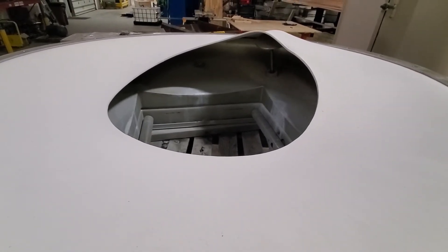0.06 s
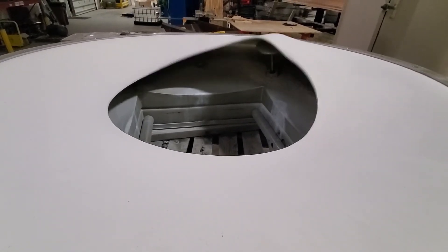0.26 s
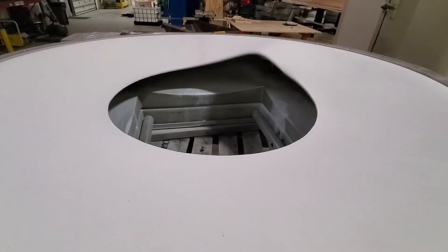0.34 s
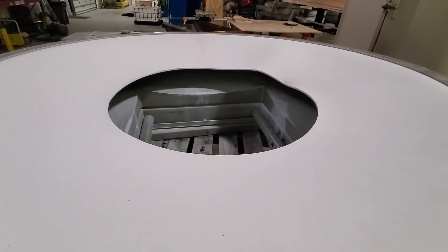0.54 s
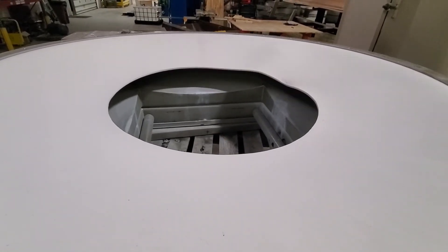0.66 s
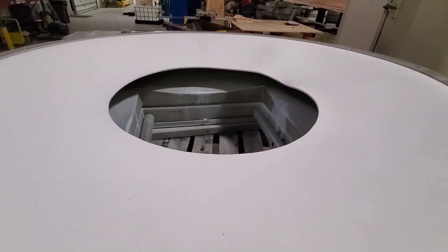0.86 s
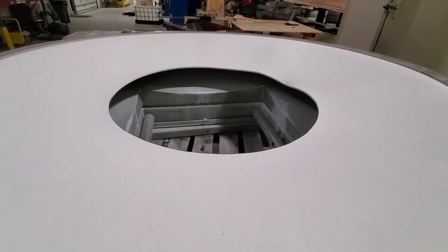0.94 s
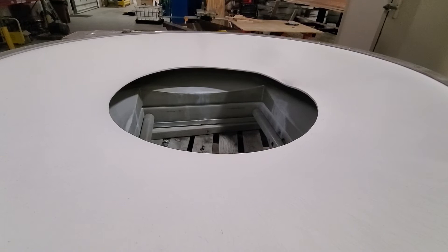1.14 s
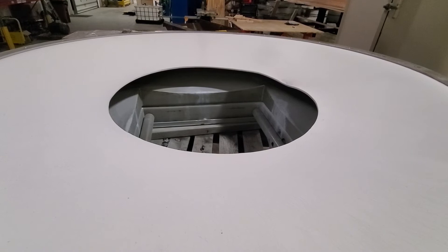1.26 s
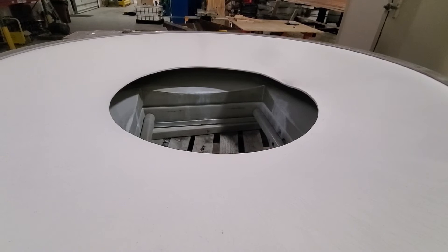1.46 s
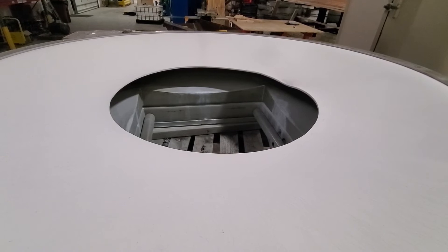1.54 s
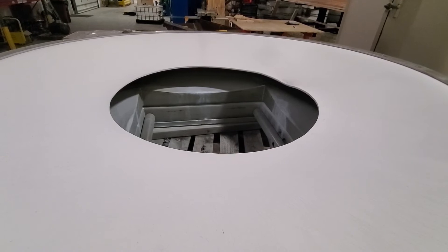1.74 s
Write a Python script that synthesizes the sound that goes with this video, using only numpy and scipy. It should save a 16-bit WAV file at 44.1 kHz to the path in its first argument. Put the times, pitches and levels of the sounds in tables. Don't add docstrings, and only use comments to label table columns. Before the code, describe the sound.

Compressed air bursts through a valve with airy whistles and a small squeak, the piston bangs a steel shell in a quick double blow, then hiss and hall echo die into low hum; close handheld microphone.

```python
import sys
import numpy as np
from scipy import signal
from scipy.fft import rfft, irfft, next_fast_len
from scipy.io import wavfile
from scipy.ndimage import uniform_filter1d

SR = 44100
rng = np.random.default_rng(int(sys.argv[2]) if len(sys.argv) > 2 else 0)


def to_wav(s):
    ch = np.atleast_2d(s).T
    pcm = np.round(np.clip(ch, -1, 1) * 32767)
    wavfile.write(sys.argv[1], SR, pcm.astype(np.int16))


def makeup_ratio(level_db):
    decades = np.asarray(level_db, float) / 20
    return 10 ** decades


N = 79380
T = np.arange(N) / SR
M = next_fast_len(3 * N // 2)
F = np.maximum(np.arange(M // 2 + 1) * SR / M, 1)


def curve(table):
    return np.interp(T, *np.array(table, float).T)


def over_hz(table):
    hz, value = np.array(table, float).T
    return np.interp(np.log(F), np.log(hz), value)


def to_sound(spectrum):
    return irfft(spectrum, M)[..., :N]


def colour(x, gain):
    return to_sound(rfft(x, M) * gain)


def level(x, db):
    return x * makeup_ratio(db) / np.sqrt(np.mean(x ** 2))


def walk(rate_hz):
    hold = int(SR / rate_hz / 2)
    steps = np.repeat(rng.standard_normal(N // hold + 1), hold)
    smooth = uniform_filter1d(uniform_filter1d(steps, hold), hold)
    return level(smooth[:N], 0)


# (frequency [Hz], likeness [0-1])
PORT_LIKENESS = [(100, 0.98), (300, 0.81), (700, 0), (1500, 0.28), (3000, 0.16)]


def wide():
    left_lag_s = 16 / SR
    alike = np.clip(over_hz(PORT_LIKENESS), 0, 1)
    right, other = rfft(rng.standard_normal((2, M)))
    left = alike * right + np.sqrt(1 - alike ** 2) * other
    left = left * np.exp(-2j * np.pi * F * left_lag_s * (F > 900))
    return np.array([left, right])


def bands(db, flicker_db, rate_hz, shape=None):
    spectrum, out = wide() * makeup_ratio(db), 0
    for hz in 35 * 2 ** np.arange(0, 9.1, .5):
        window = np.cos(np.pi * np.clip(np.log2(F / hz), -.5, .5)) ** 2
        band = to_sound(spectrum * window) * makeup_ratio(flicker_db * walk(rate_hz))
        out = out + band * (1 if shape is None else shape(hz))
    return out


def ring(hz, t60_s, swell_s, lag=0.):
    return np.sin(2 * np.pi * hz * T - lag) * makeup_ratio(-60 * T / t60_s) * (1 - np.exp(-T / max(swell_s, 1e-4)))


# (frequency [Hz], level [dB])
HALL_NOISE = [(45, -1), (110, -6), (270, -8), (420, -20), (950, -33.5), (1500, -30), (6000, -38.5),
              (7300, -57.5)]
# (frequency [Hz], level [dB])
HUM_LINES = [(48.4, -52), (199.2, -57), (226.1, -58.5), (689.1, -67.5), (1378, -61.5), (1604, -76.5),
             (1836, -69.5), (2062, -66)]


def workshop():
    lift_db, waver_db = 8, 1.2
    hall = level(bands(over_hz(HALL_NOISE), 0.87, 7.28), -34.5)
    phases = rng.uniform(0, 2 * np.pi, (len(HUM_LINES), 2))
    hum = 0
    for (hz, db), (start, spread) in zip(HUM_LINES, phases):
        port_phase = np.array([[spread * min(hz / 3000, 1)], [0]])
        tone = np.sin(2 * np.pi * hz * T + start + port_phase)
        hum = hum + makeup_ratio(db + lift_db + waver_db * walk(7)) * tone
    rumble_hz, rumble_db, rumble_fade_s = 46, -37, 0.35
    rumble_shape = 1 / (1 + (np.log2(F / rumble_hz) / 0.54) ** 4)
    rumble = level(colour(rng.standard_normal(N), rumble_shape), rumble_db)
    rumble = rumble * np.exp(-(T / rumble_fade_s) ** 2)
    self_noise = level(rng.standard_normal((2, N)), -104)
    return hall + hum + rumble + self_noise


# (time [s], level [dB])
AIR_FLOW = [
    (.152, -72),
    (.172, -34.5),
    (.232, -22.5),
    (.26, -27),
    (.35, -24),
    (.43, -20),
    (.5, -19.5),
    (.745, -22.5),
    (1., -69.5),
]
# (frequency [Hz], level [dB])
HISS = [(300, -4), (1200, -13), (3200, -1), (5600, -0.5), (7000, 0.5), (8400, -11), (11500, -1),
        (15500, -0.5)]


def jet():
    treble_tilt = 1.17
    flow = curve(AIR_FLOW)
    peak = flow.max()

    def swell(hz):
        return makeup_ratio((flow - peak) * (treble_tilt if hz > 8000 else 1) + peak)

    hiss_db = over_hz(HISS)
    hiss = bands(hiss_db, 1.8, 15.77, swell)
    return hiss / np.sqrt(np.mean(makeup_ratio(hiss_db) ** 2))


def ripple():
    depth_db, spacing_hz = 3.0, 70
    bumpy = np.interp(F / spacing_hz, np.arange(1000), rng.standard_normal(size=1000))
    return makeup_ratio(depth_db * bumpy - 1)


# (frequency [Hz], t60 [s])
HALL_DECAY = [(200, 0.58), (1000, 0.87), (3000, 1.245), (6000, 0.5), (8000, 0.6), (12000, 0.1)]


def room(x):
    spectrum, tail = wide(), 0
    table_hz, table_t60 = np.array(HALL_DECAY, float).T
    for hz in 60 * 2 ** np.arange(0, 9.):
        t60_s = np.interp(np.log(hz), np.log(table_hz), table_t60)
        band = to_sound(spectrum * np.cos(np.pi / 2 * np.clip(np.log2(F / hz), -1, 1)) ** 2)
        tail = tail + band * makeup_ratio(-60 * T / t60_s) * (1 - np.exp(-T / .008))
    return colour(x.mean(axis=0), rfft(tail, M) / np.sqrt(SR / 20))


# (start [s], peak [s], end [s], frequency [Hz], level [dB], width [Hz])
EDGE_TONES = [
    (0.209, 0.21, 0.34, 5390, -35, 56.5),
    (0.333, 0.426, 0.65, 3400, -36.5, 85),
    (0.385, 0.47, 0.46, 5640, -29.5, 270),
    (0.552, .65, 1, 3060, -39, 390),
    (.55, .65, 0.845, 5850, -32.5, 500),
    (0.31, .42, 0.39, 13000, -38, 900),
]


def whistles():
    out = 0
    for start, peak, end, hz, db, width_hz in EDGE_TONES:
        tone = level(to_sound(wide() / (1 + ((F - hz) * 2 / width_hz) ** 2)), db)
        out = out + tone * np.interp(T, [start, peak, end], [0, 1, 0])
    return out


# (time [s], frequency [Hz], level [dB], t60 [s])
LINKAGE_BUMPS = [
    (.316, 445, -23.5, 0.16),
    (0.27, 394, -30.5, 0.088),
    (0.29, 490, -37, 0.069),
    (0.21, 84, -24, .11),
    (.514, 226, -13.5, 0.28),
]


def bumps():
    out = np.zeros((2, N))
    for start, hz, db, t60_s in LINKAGE_BUMPS:
        out = out + makeup_ratio(db) * np.interp(T - start, T, ring(hz, t60_s, .003), left=0)
    return out


# (time [s], level [dB])
SEAL_SQUEAK = [
    (.215, -67),
    (.25, -37.5),
    (.295, -29),
    (.33, -39),
    (.36, -43),
    (.395, -35),
    (.44, -39.5),
    (.47, -63),
]


def squeak():
    pitch_hz = 1682 + 4.2 * walk(15)
    phase = 2 * np.pi * np.cumsum(pitch_hz) / SR
    loudness = makeup_ratio(curve(SEAL_SQUEAK) + 1 + 0.92 * walk(36)) * (T < .49)
    return loudness * np.sin(phase + np.array([[1.2], [0]]))


# (time [s], level [dB], contact [ms])
BLOWS = [
    (.5082, -11.5, 0.54),
    (0.5097, -4, 0.36),
    (.5128, -13, 0.2),
    (.5165, -5.5, 0.6),
]
# (frequency [Hz], level [dB], t60 [s], swell [ms])
SHELL_MODES = [(169, -4.5, 0.063, 1.5), (277, -16, 0.45, 6), (301, -18.5, 0.75, 48), (388.7, -13, 0.84, 13),
               (441.8, -2.5, 0.21, 1.3), (599, -11.5, 0.24, 8.2), (655, -13, 0.14, 2.8),
               (739.5, -1, 0.19, 2.1), (741.4, -4.5, 0.14, 14), (859, -20.5, 0.34, 5),
               (937, -13.5, 0.32, 4.9), (1036, -16, 0.37, 4.1), (1189, -12.5, 0.14, 2),
               (1332, -23.5, 0.64, 20)]
# (frequency [Hz], level [dB], t60 [s], left minus right [dB])
ROD_MODES = [(2113, -22, 0.045, 8), (3216, -24.5, 0.18, 6.5), (3217, -8, 0.019, -12),
             (4322, -22, 0.054, -10), (5242, -7, 0.042, -13), (5965, -13.5, 0.048, -6),
             (7040, -28, 0.053, -23)]


def knock():
    shell_struck_s, shell_db, rod_db, rod_rough_db = .5081, 3, 16, 5.5
    rebounds = 0
    for start, db, contact_ms in BLOWS:
        softness = 1 + 1j * F * contact_ms / 1000
        rebounds = rebounds + makeup_ratio(db) * np.exp(-2j * np.pi * F * start) / softness

    body = 0
    shell_lags = rng.standard_normal((len(SHELL_MODES), 2))
    for (hz, db, t60_s, swell_ms), lags in zip(SHELL_MODES, shell_lags):
        body = body - makeup_ratio(db) * np.array([ring(hz, t60_s, swell_ms / 1000, hz / 4000 * lag) for lag in lags])
    shell = colour(body, makeup_ratio(shell_db) * np.exp(-2j * np.pi * F * shell_struck_s))

    rod = 0
    rod_lags = 2 * rng.standard_normal((len(ROD_MODES), 2))
    for (hz, db, t60_s, pan_db), (left_lag, right_lag) in zip(ROD_MODES, rod_lags):
        pair = np.array([ring(hz, t60_s, .0008, left_lag), ring(hz, t60_s, .00059, right_lag)])
        pan = np.array([[pan_db], [-pan_db]]) / 2
        rod = rod + makeup_ratio(db + rod_rough_db * walk(238) + pan) * pair

    crack = level(to_sound(wide() / (1 + (F / 6600) ** 14)), -19) * makeup_ratio(-60 * T / 0.24)
    thud_hz, thud_db, thud_t60_s, thud_width = 661, -18.5, 0.23, 0.86
    thud = level(to_sound(wide() / (1 + (np.log2(F / thud_hz) / 1.12) ** 4)), thud_db)
    thud = thud * makeup_ratio(-60 * T / thud_t60_s)
    thud = thud_width * thud + (1 - thud_width) * thud.mean(axis=0)
    blow = colour(crack + thud, rebounds) * makeup_ratio(rod_db)
    return shell + colour(rod, rebounds) * makeup_ratio(rod_db), blow


def scene():
    jet_wet_db, knock_wet_db, ring_wet_db = -0.5, -9.5, -5.5
    air = jet() + whistles()
    seal = squeak()
    rings, blow = knock()
    wet = room(makeup_ratio(jet_wet_db) * air + makeup_ratio(knock_wet_db) * (blow + makeup_ratio(ring_wet_db) * rings))
    background = workshop()
    direct = colour(air, ripple()) + bumps() + seal + rings + blow
    return background + direct + wet


def top_cut(x):
    return signal.sosfilt(signal.butter(12, 16530, fs=SR, output="sos"), x)


# (frequency [Hz], left minus right [dB])
PORT_BALANCE = [(800, 0.5), (1300, 2.5), (2500, -2), (5500, -5.5), (7500, 2), (11500, -4), (14000, 1.5)]
# (time [s], gain [dB])
AUTO_GAIN = [
    (.25, 0.5),
    (.503, -1.5),
    (.512, -15.5),
    (.53, -11.5),
    (.575, -8.5),
    (.635, -7.5),
    (.9, -7.5),
    (1.2, -6.5),
]


def record(dry):
    top_hz, low_cut_hz = 15800, 39
    notch_hz, notch_width_hz, notch_db = 7730, 470, -6
    ports = makeup_ratio(over_hz(PORT_BALANCE) * np.array([[.5], [-.5]]))
    ports = ports / (1 + (F / top_hz) ** 200)
    ports = ports * makeup_ratio(notch_db / (1 + ((F - notch_hz) / notch_width_hz) ** 2))
    ports = ports / (1 + (low_cut_hz / F) ** 8)
    gain = makeup_ratio(uniform_filter1d(curve(AUTO_GAIN), size=200))
    clipped = np.clip(colour(dry, ports) * gain, -1, 1)
    mix = colour(clipped, F < top_hz + 200) * .97
    return top_cut(mix)


dry = scene()
out = record(dry)
to_wav(out)
```